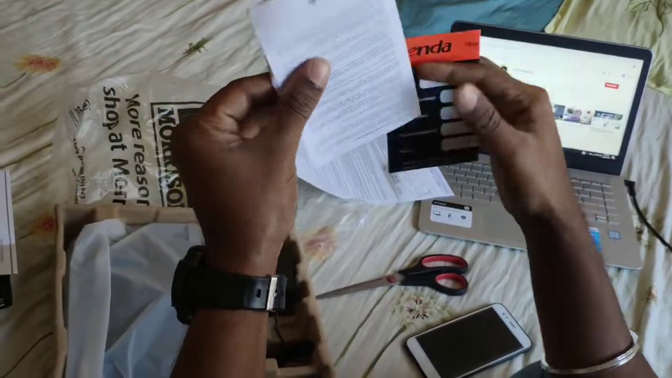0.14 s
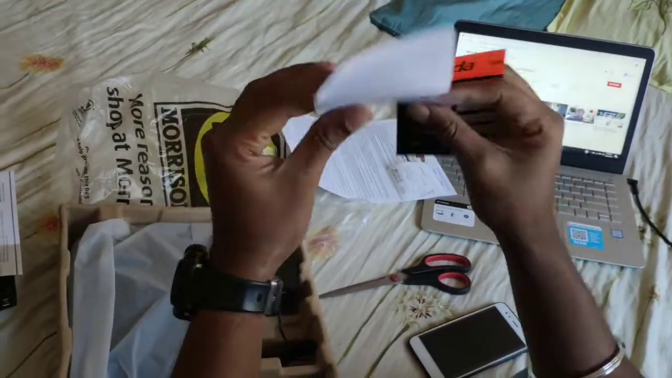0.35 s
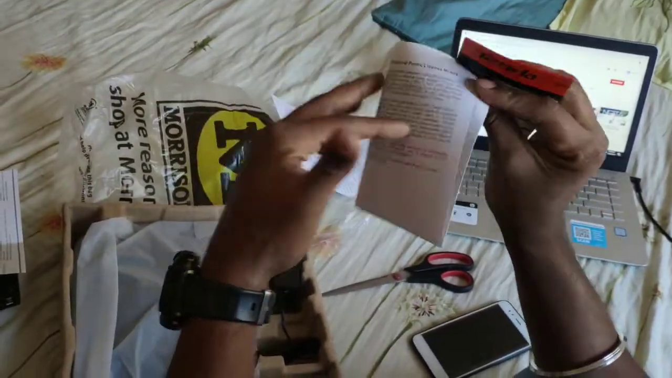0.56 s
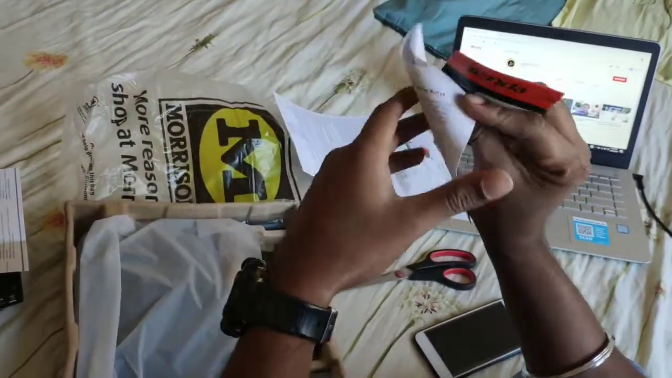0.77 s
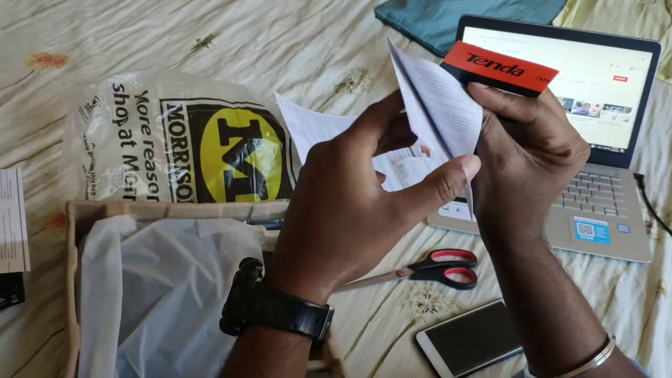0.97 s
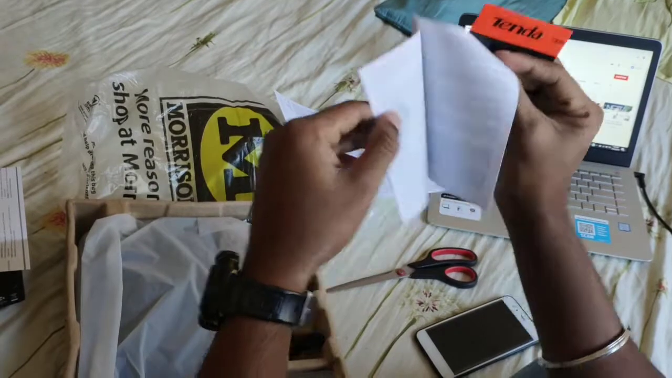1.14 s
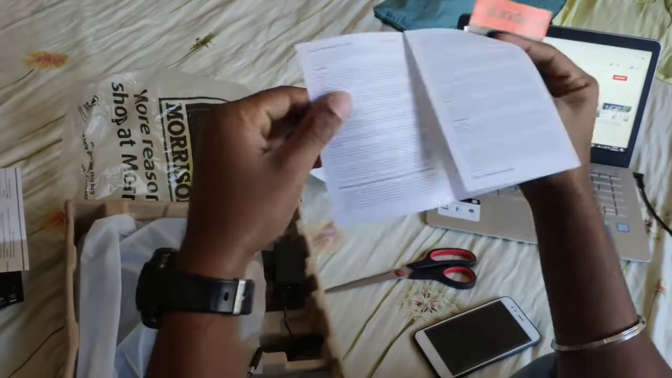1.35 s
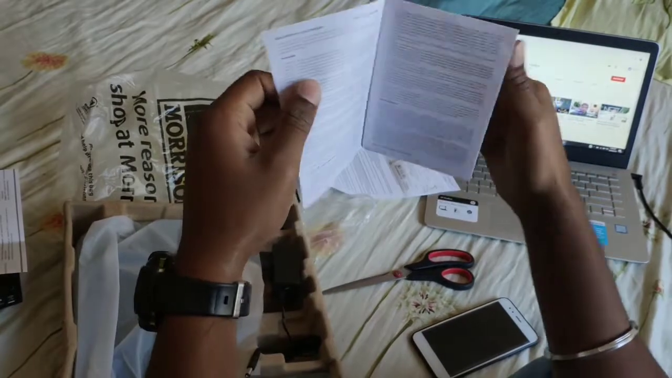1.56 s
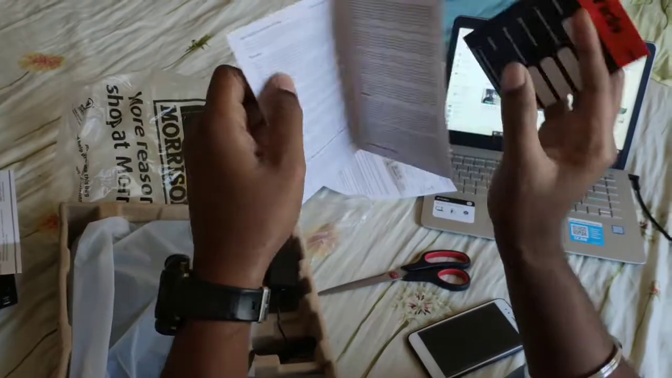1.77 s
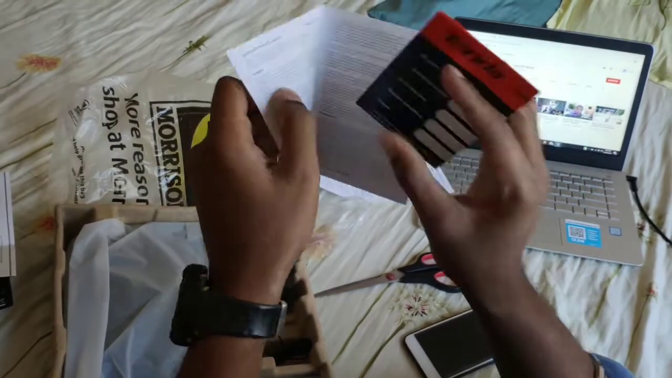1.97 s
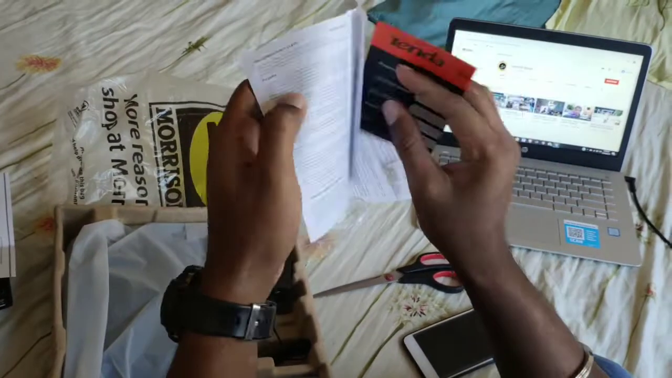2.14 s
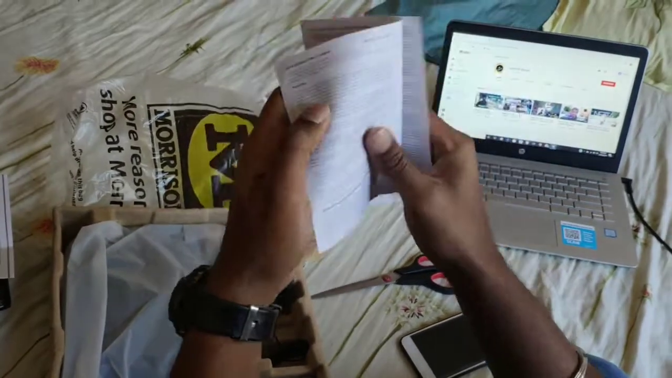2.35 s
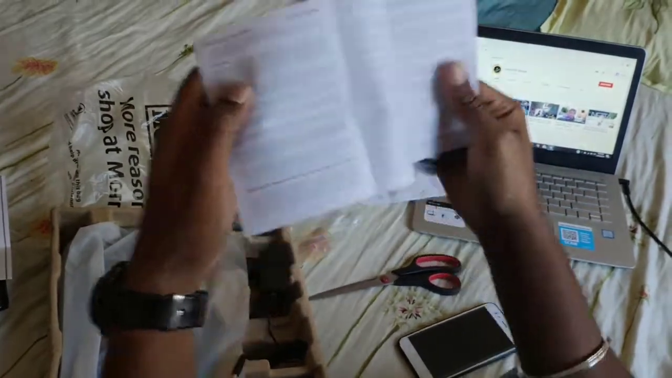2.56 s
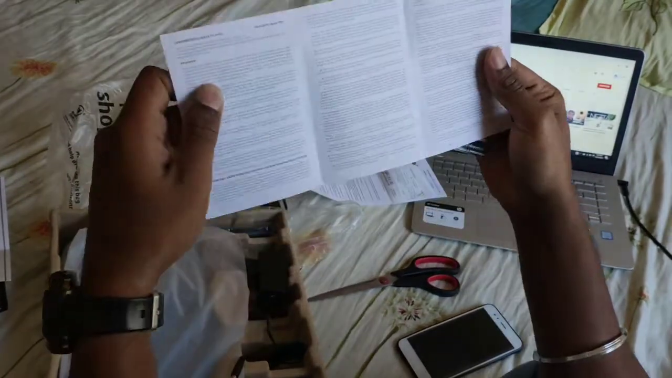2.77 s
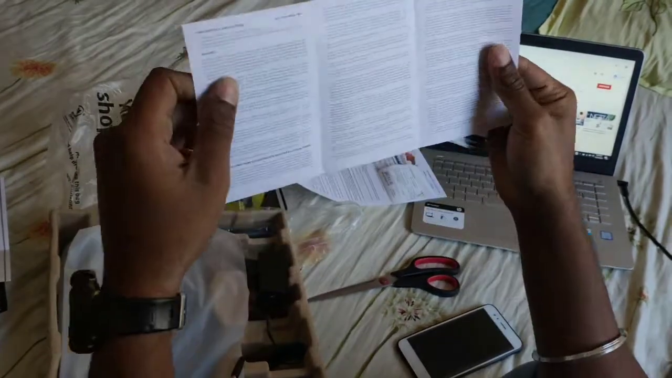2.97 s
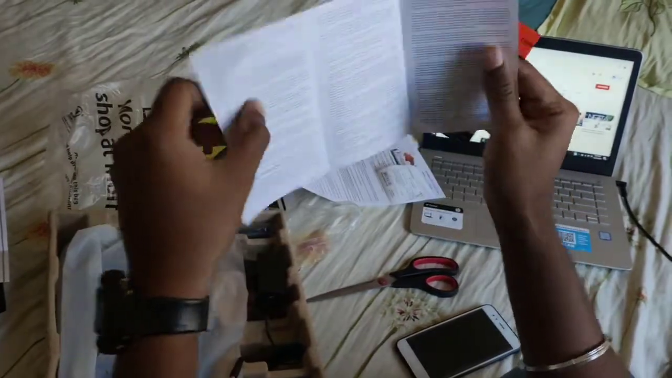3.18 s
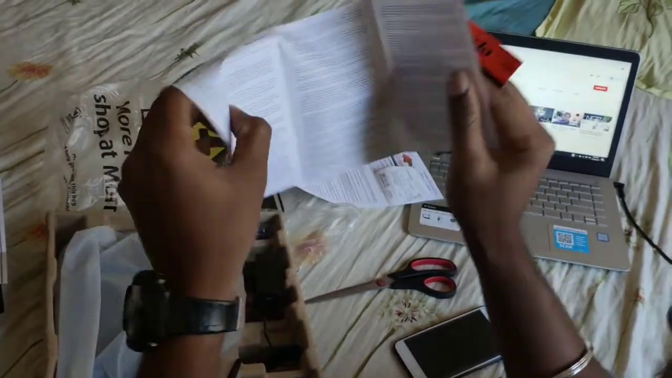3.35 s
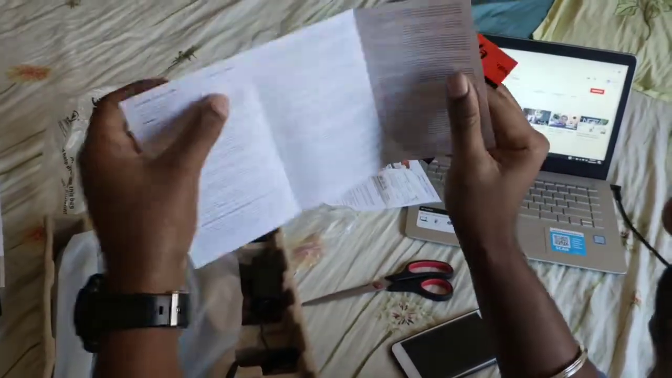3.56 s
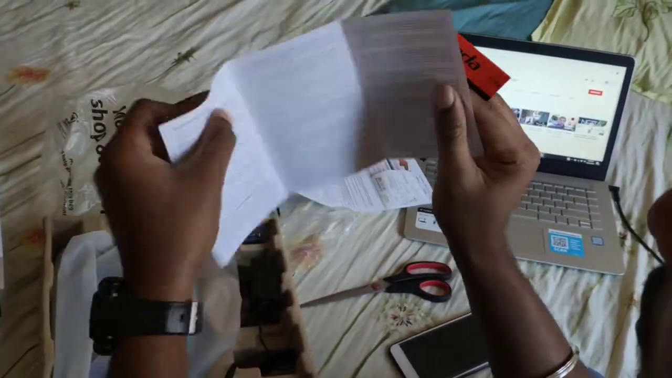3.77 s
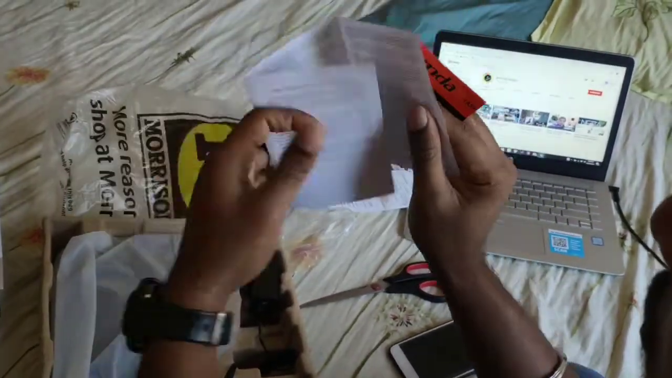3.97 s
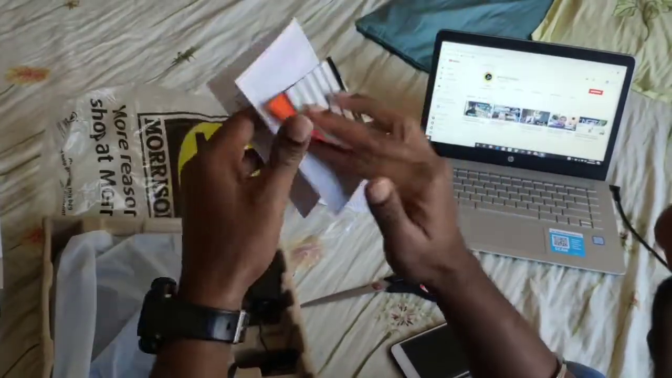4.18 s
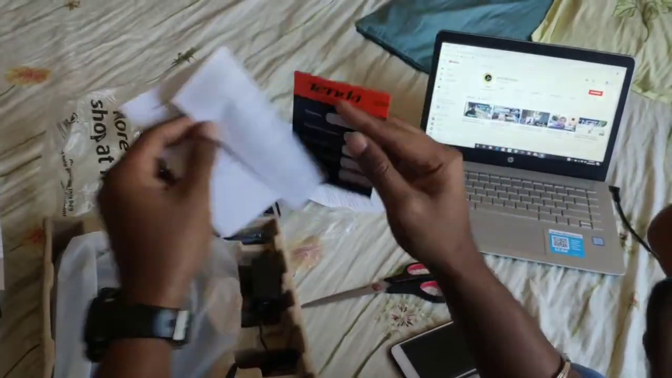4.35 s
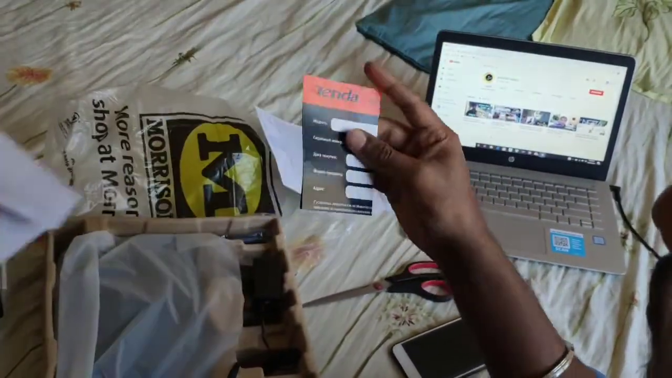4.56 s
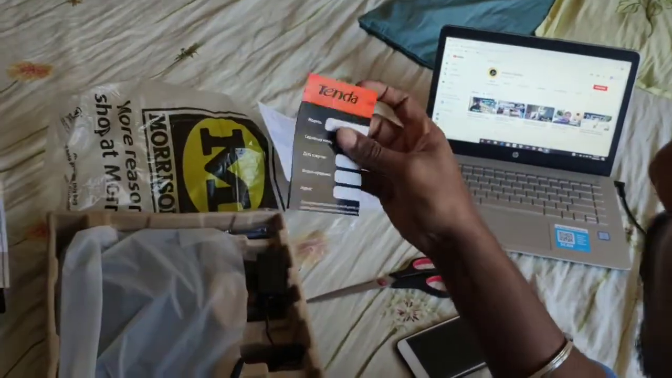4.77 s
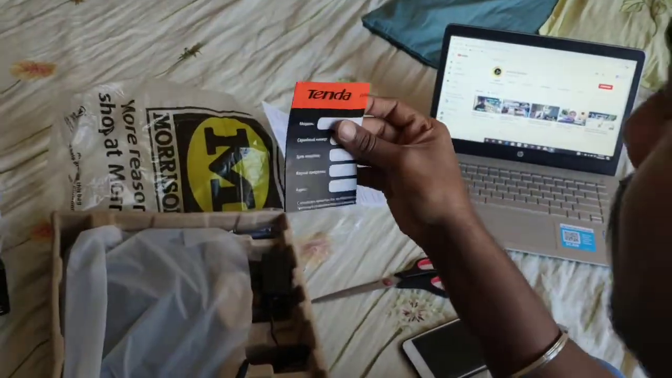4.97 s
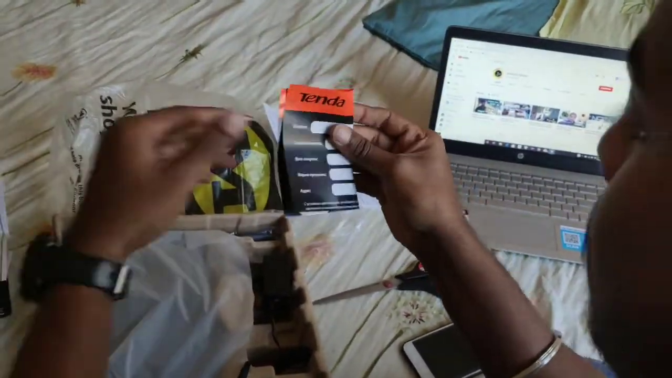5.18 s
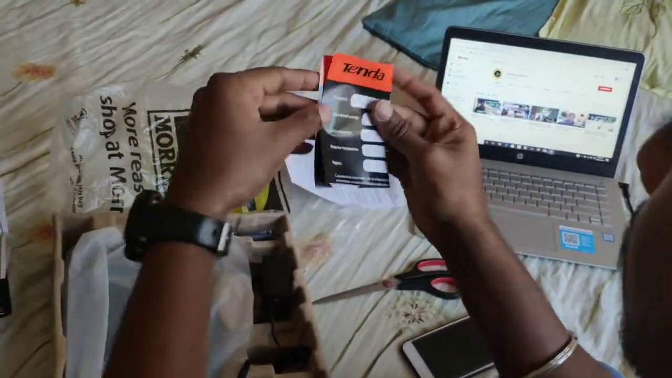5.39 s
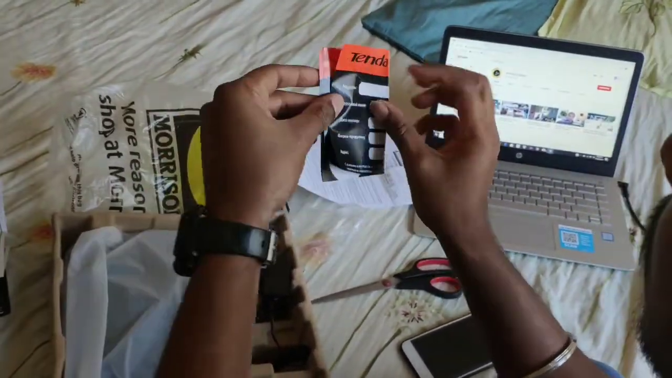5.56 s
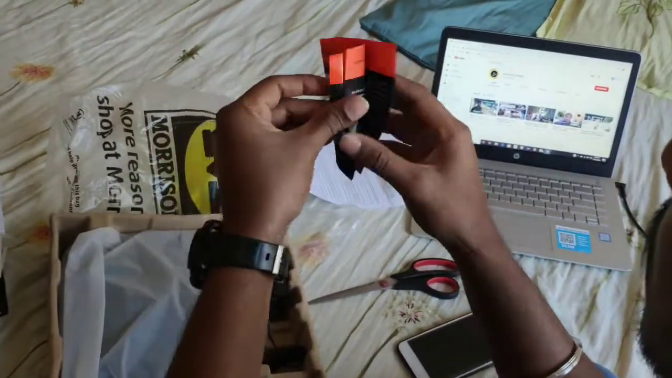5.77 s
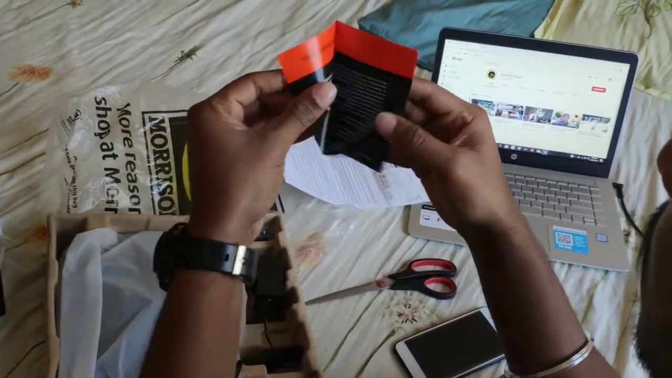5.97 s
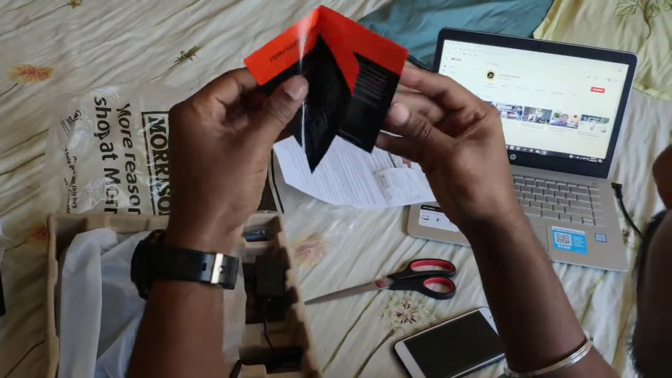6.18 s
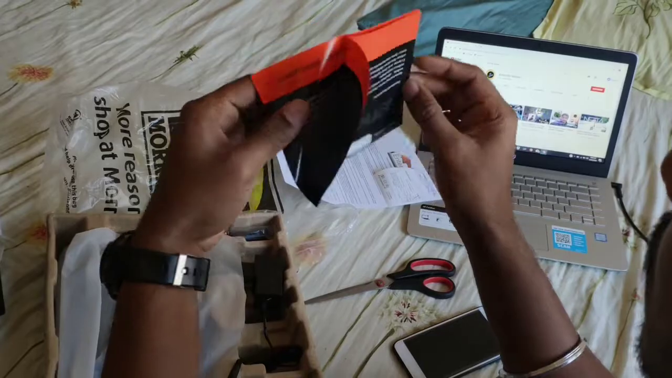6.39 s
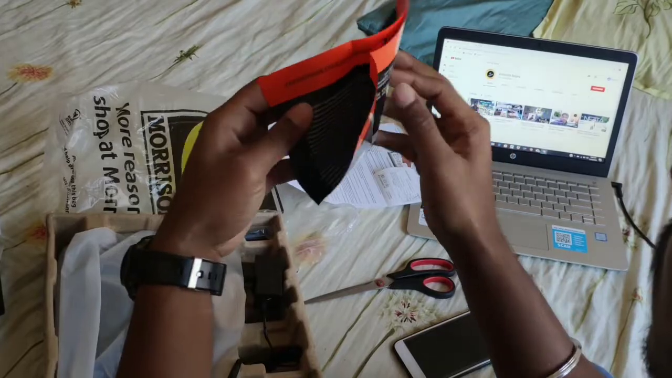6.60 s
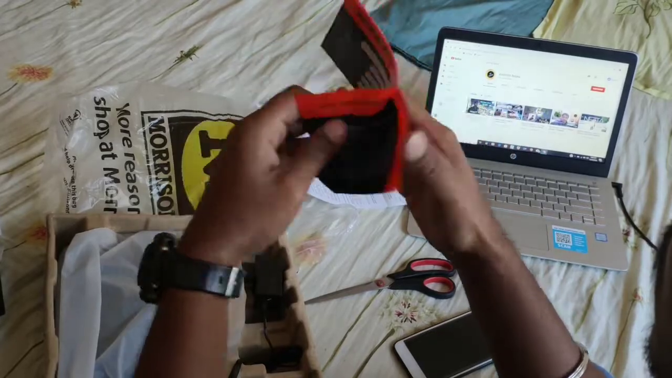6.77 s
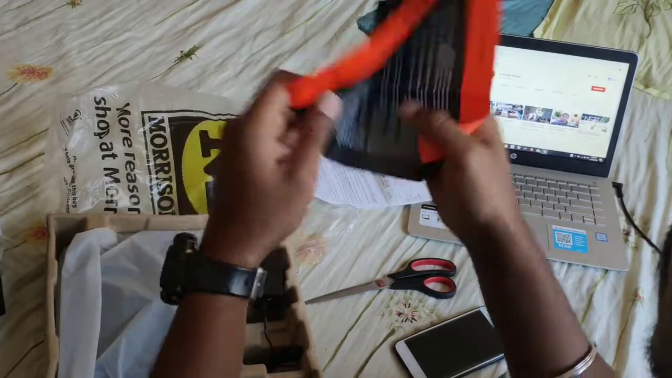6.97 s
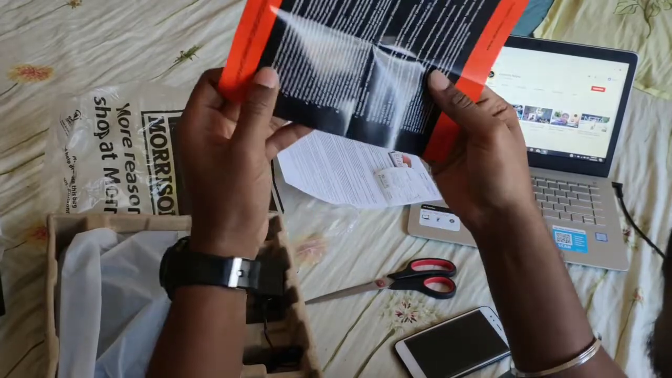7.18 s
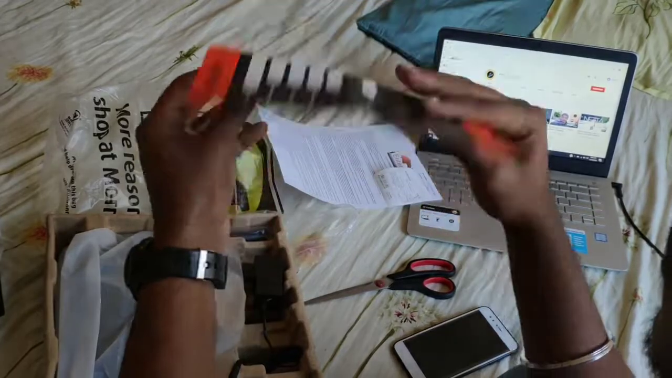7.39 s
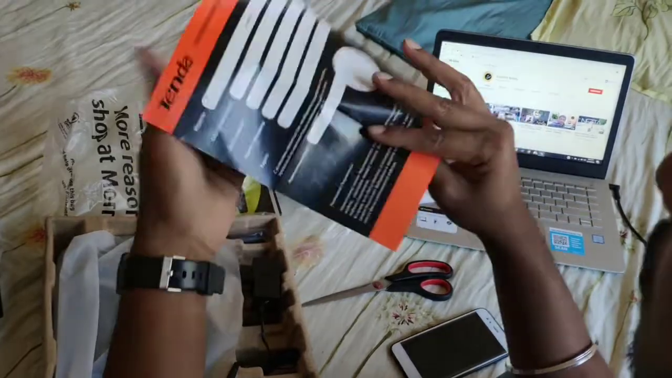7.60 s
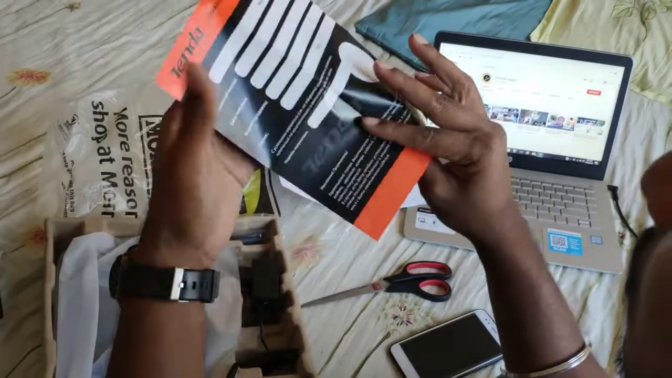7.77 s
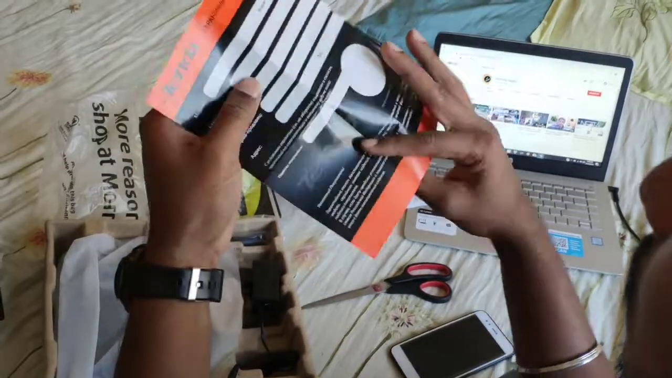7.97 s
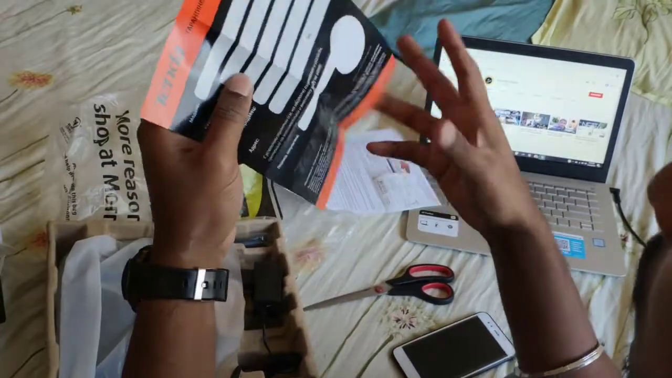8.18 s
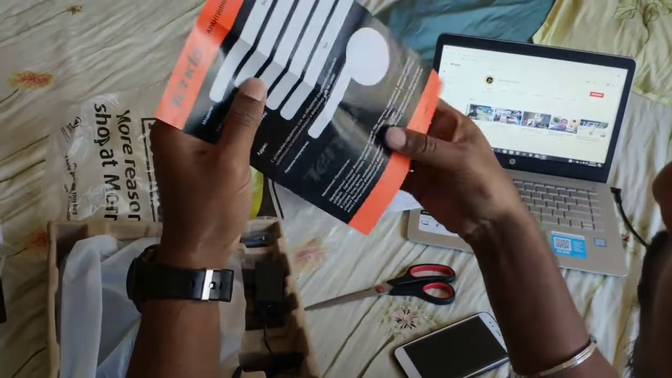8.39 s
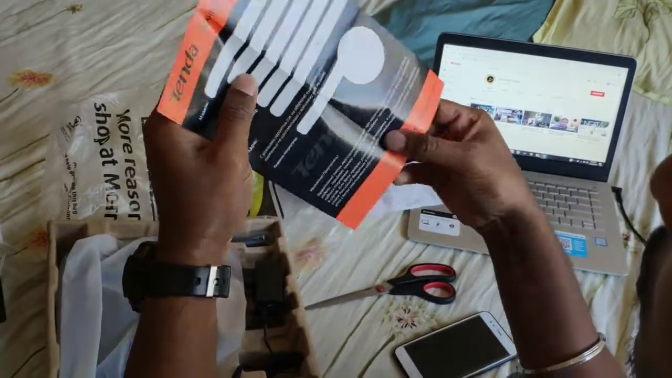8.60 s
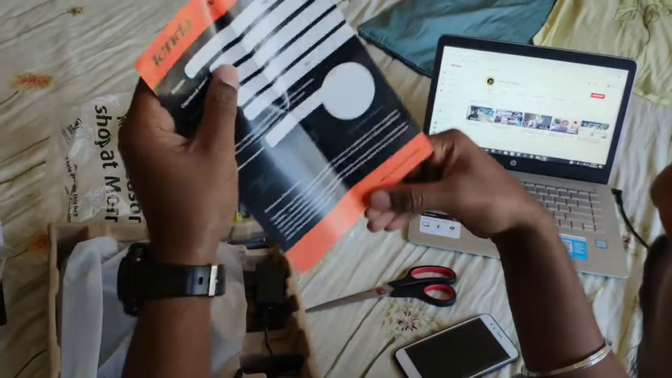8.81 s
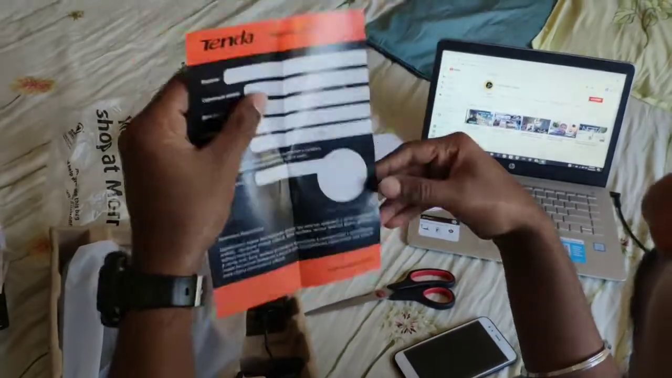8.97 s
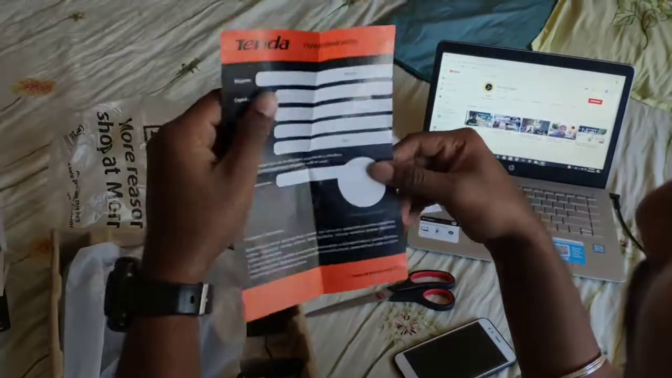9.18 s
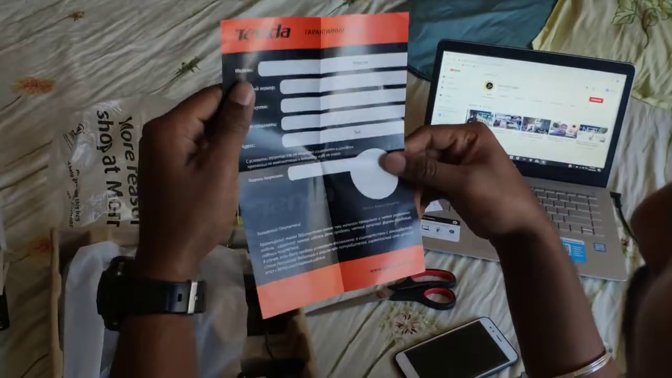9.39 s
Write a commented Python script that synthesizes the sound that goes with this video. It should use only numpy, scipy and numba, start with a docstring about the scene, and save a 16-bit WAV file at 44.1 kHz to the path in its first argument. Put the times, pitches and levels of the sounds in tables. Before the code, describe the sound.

Close, crisp paper rustling: creases snap, sheets rub and flutter with soft air puffs, over faint low rumble and hiss indoors.

```python
"""Hands unfold a thin paper leaflet, put it down, then unfold a stiffer glossy one, under a phone in a bedroom.
Creases snap as ragged noise bursts; sheets rub and crackle as noise shaped by tiny slips; swung sheets push
low puffs of air. The small room answers the paper, over a low wavering rumble and a faint hiss throughout.
The phone's two microphone ports ring at different pitches."""
import sys
import numpy as np
from scipy import signal
from scipy.fft import rfft, irfft, next_fast_len
from scipy.io import wavfile
from scipy.ndimage import uniform_filter1d
from numba import njit

SR = 44100
rng = np.random.default_rng(int(sys.argv[2]) if len(sys.argv) > 2 else 0)


def bounce(signal):
    """Save signal as a 16-bit WAV file at the path given by the first command-line argument."""
    frames = np.transpose(np.atleast_2d(signal))
    limited = np.clip(frames, -1, 1)
    pcm = np.round(limited * 32767).astype(np.int16)
    wavfile.write(sys.argv[1], SR, pcm)


N = 416372  # length in samples

# Snapping creases. Each row: peak time in seconds, ring peak in dB, sheet ring in Hz, flap in dB re ring,
# crispness in dB re ring, decay in seconds per 60 dB, left minus right in dB.
CREASE_SNAPS = [(.3277, -42, 3630, 1, -11, 0.014, -14), (.3455, -33.5, 5440, -21, -4, 0.036, -9),
                (0.502, -27, 4810, -8, -2, .028, -13), (0.527, -16, 4460, -15.5, 0, 0.018, -7),
                (.5711, -14.5, 4700, -15, -12, 0.035, -2.5), (0.7693, -16.5, 5130, -22, -13, .013, -10),
                (.784, -36, 5120, -24, -8, .02, -7), (.877, -27.5, 5050, -20, 8, 0.024, -10),
                (0.8885, -26.5, 5200, -14, 10, 0.032, 2), (.978, -32, 5100, -28, -4, 0.036, -2),
                (1.109, -31, 5200, -19, 3, .015, -10), (1.1194, -7.5, 4940, -26.5, -10, 0.018, -8.5),
                (1.2291, -33.5, 5240, -26, 1, 0.11, -13), (1.316, -36.5, 5200, -20, 0, 0.02, -7),
                (1.4406, -28.5, 4500, -5.5, -2, 0.11, 0.5), (1.866, -46.5, 4500, 6, -10, .012, 5),
                (2.0735, -35, 5620, -1, 4.5, .014, -2), (2.176, -28, 4800, -5.5, -0.5, 0.036, 1),
                (2.206, -8.5, 5330, -10.5, -1, 0.012, -4), (2.5811, -26.5, 3800, -4, -24, 0.084, 1),
                (2.6785, -4, 5080, -17, -15, 0.044, 1), (3.1843, -35.5, 5950, -23, -10, 0.0096, -16),
                (3.3157, -20.5, 4900, -9, -21, 0.027, 3), (3.442, -24.5, 5000, -2, -9, 0.032, 2),
                (3.4517, -9.5, 5000, -26, -16, 0.026, 0), (3.4745, -17, 5860, -25, -10, .011, -3),
                (3.5899, -29, 4000, -7, -18, .04, 4), (3.611, -25.5, 5010, -1, -15, 0.025, -2),
                (3.655, -13.5, 5600, -28, -1, .008, -2), (3.67, -12, 5100, -11, -4, 0.047, 5.5),
                (3.842, -23.5, 4960, -4.5, -14, 0.052, -1), (3.8854, -29, 5100, -18, -10, 0.033, -7),
                (4.102, -28, 5200, -17, 3, .02, -4), (4.113, -28, 5030, -12, 10, .045, -4),
                (4.3094, -12.5, 4750, -16.5, 1.5, 0.055, -2), (4.3376, -18, 4500, -28, -8, .012, -12),
                (4.359, -0.5, 4700, -29, -24, .019, -1), (4.8133, -24.5, 6460, -27, -6, 0.076, -7),
                (4.8673, -14.5, 4900, -17, -8, 0.06, 11.5), (5.0594, -28.5, 4420, -17, -15, 0.0059, -7),
                (5.0685, -35, 4600, -1.5, 0, 0.0079, -13), (5.3133, -36.5, 3560, -19, -1, 0.012, -7),
                (5.342, -24.5, 3650, -29, -1.5, 0.023, -1), (5.4254, -26.5, 3320, -2, -21, 0.0063, -7),
                (5.436, -32, 3890, -17, 2, 0.0092, 8), (5.4577, -20.5, 3720, -25, 0.5, 0.007, 0),
                (5.602, -8, 3640, -24, 7.5, 0.0075, 1), (5.656, -17.5, 3440, -15, -7, .018, -5),
                (5.697, -12, 3900, -23, -10, 0.0035, -7), (5.7143, -21.5, 3600, -9, -16, 0.0082, -9),
                (5.758, -4.5, 4100, -20, 2, 0.0052, -3), (5.8166, -17, 4130, -24, -3, 0.034, -2),
                (5.8368, -19, 4100, -26, -7, 0.018, -9), (5.867, -9.5, 3990, -35, -3, .018, -2),
                (5.995, -33.5, 4120, -21, -15, .009, -11), (6.0211, -23, 4080, -9, -9, .025, -1),
                (6.0453, -17.5, 3500, -26, -0.5, 0.021, -7), (6.0885, -32.5, 3600, 7, -15, 0.011, 0),
                (6.1955, -13.5, 4530, -22, 4, 0.02, 1.5), (6.2602, -35, 4400, -3, -13, 0.021, 0),
                (6.298, -27.5, 3770, -11.5, -2, 0.029, 2), (6.3837, -32, 4130, -15, 0, .04, 0),
                (6.4677, -17, 4140, -9, -17, 0.0097, 0.5), (6.52, -24.5, 3130, -2.5, -27, 0.0061, -2),
                (6.553, -35.5, 3910, -5, -6, .018, -2), (6.7562, -35, 5030, -15, 4, 0.046, -9),
                (6.8106, -25, 4760, -15, -1, 0.014, 1), (6.9128, -34, 5380, -29, -15, 0.023, -11),
                (6.9664, -25.5, 3830, -9, 0, 0.032, -4.5), (6.982, -36.5, 4000, 5, -10, 0.022, -2),
                (7.091, -18.5, 4200, -2, -10, 0.014, 1), (7.102, -7, 3930, -11.5, -10, .02, -3.5),
                (7.1298, -13, 5000, -23, 3, 0.013, -2), (7.2384, -31, 5390, -8.5, -7, 0.031, -7),
                (7.308, -23.5, 4730, 0, -4, 0.033, -3), (7.353, -32, 3280, 7, -22, 0.033, 2),
                (7.382, -3, 4570, -17.5, -4.5, 0.0051, -2), (7.3932, -28, 4830, 3, 2, 0.027, 5),
                (7.466, -27, 4700, -12, -4, 0.06, -8), (7.501, -31, 4300, 1, -10, .025, -1),
                (7.58, -21, 4500, -12, -7.5, .012, -6), (7.5873, -16.5, 3860, -8, -25, 0.027, -2),
                (7.638, -28, 5200, -24, -15, .018, -14), (7.703, -16.5, 3100, -10.5, -30, 0.036, -1),
                (7.7561, -15.5, 4270, -16, -13, 0.024, 4), (7.7659, -1, 5150, -20, -22, 0.013, -2.5),
                (8.002, -30.5, 4800, -5.5, -8, 0.019, -5), (8.121, -35.5, 4000, 6, -12, .015, -3),
                (8.1389, -24, 3700, -29, 1, 0.015, -8.5), (8.2006, -29, 5100, 2.5, 0, 0.038, -1),
                (8.2671, -32.5, 4950, -5, -8, 0.014, -7), (8.343, -36.5, 4000, 6, -13, 0.013, 0),
                (8.3562, -21.5, 5400, -26, 6.5, 0.028, -3), (8.3827, -25, 5520, -9, 1, 0.015, -5),
                (8.3984, -15.5, 5900, -7, 8.5, 0.015, -0.5), (8.6568, -45, 3250, 17.5, 4, 0.03, -1),
                (8.8406, -12, 3900, -9.5, -15, .005, -1.5), (9.0126, -35, 5470, -7.5, 5.5, 0.045, -2),
                (9.132, -38, 5500, -1, 3, 0.018, 0), (9.1838, -35, 5880, -4, 2, 0.0099, 2),
                (9.2237, -26.5, 4500, -1.5, -19, 0.03, -1)]
BUILD_SHARE = 0.62  # build-up of a snap as a share of its decay


def snaps():
    """A crease buckles in a ragged run of slips that builds to one crack and dies fast; the sheet rings and flaps."""
    size, lead = 4096, 1536  # samples in a snap, and those before its crack
    out = np.zeros((2, N + size))
    t = (np.arange(size) - lead) / SR
    for peak_s, ring_db, ring_hz, flap_db, crisp_db, t60, pan_db in CREASE_SNAPS:
        build = -t / max(BUILD_SHARE * t60, 1e-3)
        die = t / max(t60, .003)
        fade = decay(np.where(t < 0, build, die), 1)
        crack = 1.7 * (t >= 0) * np.exp(-np.abs(t) / 0.0001)
        # a steady floor keeps the run going between slips
        run = fade * (1.11 + crackle(size, 0.0077, 1.28, 0.0013)) + crack
        ring = band(run * pair((size,), 0.056), ring_hz, 2.28)
        body = 0.27 * band(run * pair((size,), 0.031), 2780, 1.0)
        crisp = band(run * pair((size,), 0.025), 9100, 0.79)
        gains = undb([ring_db, ring_db + crisp_db, ring_db + flap_db])
        layers = [ring + body, crisp, flap(run)]
        snap = sum(gain * x / np.abs(x).max() for gain, x in zip(gains, layers))
        start = max(int(peak_s * SR) - lead, 0)
        out[:, start:start + size] += snap * sides(pan_db)[:, None]
    return out[:, :N]


def flap(grain):
    """The whole sheet flexes: its bass reaches both ports alike, its upper part does not."""
    bass = band(grain * pair(grain.shape, 1.0), 842, 0.63)
    upper = band(grain * pair(grain.shape, 0.05), 1320, 0.57)
    return bass + 0.54 * upper


# Rubbing strokes, each a swell and a fade. Each row: peak time in seconds, ring level in dB at the peak,
# rise and fall in seconds per 20 dB, flap in dB re ring, crispness in dB re ring.
RUB_STROKES = [(0.044, -45, 0.032, 0.18, -12.5, 0.5), (.18, -47, 0.19, 0.061, -31, 1),
               (0.359, -43.5, 0.049, 0.076, -17, -3), (.44, -40, 0.034, 0.21, -20, 6.5),
               (.53, -36.5, 0.16, 0.17, -14, -7), (.79, -47, 0.19, 0.29, -27, 3.5),
               (.89, -41, 0.047, .17, -15, 0), (1.13, -37, 0.06, 0.12, -14, 0.5),
               (1.24, -48.5, .15, 0.18, -27, 2), (1.37, -46.5, .06, 0.097, -9, 3.5),
               (1.451, -45, 0.23, .08, -9, -5), (1.6, -65, 0.11, 0.087, 0, -1),
               (1.78, -71, 0.72, 0.61, -3, -2), (1.939, -51.5, 0.045, 0.07, 3, 0),
               (2.1, -41, 0.033, 0.11, -4.5, 0), (2.22, -33.5, 0.039, 0.13, -9, -2),
               (2.29, -41.5, 0.14, 0.083, -24, 6.5), (2.511, -37, 0.35, 0.11, -9, 0.5),
               (2.69, -36, 0.028, 0.097, -2, -8), (2.85, -56.5, .1, 0.41, -5, -5.5),
               (3.261, -48.5, 0.14, 0.22, 3, 5), (3.46, -35.5, 0.067, 0.14, -4.5, -1),
               (3.61, -46, 0.057, 0.13, 6, -23), (3.679, -36.5, 0.1, 0.11, -7, -4),
               (3.86, -41.5, 0.13, 0.21, -4, -0.5), (4.121, -36, 0.056, 0.15, -8, 3),
               (4.24, -42.5, 0.063, 0.05, -6, -4), (4.36, -29.5, 0.095, 0.11, -15, -0.5),
               (4.53, -43, 0.095, 0.077, -22, -3), (4.66, -48, 0.23, 0.12, -15, -2),
               (4.82, -45, 0.094, .1, -24, 0), (4.879, -29.5, 0.037, 0.077, -6, -2),
               (5.0, -57, 0.11, .4, 0.5, -1), (5.22, -41.5, 0.079, 0.049, -9.5, -5.5),
               (5.36, -51.5, .15, 0.18, -1.5, -0.5), (5.53, -44.5, 0.035, 0.062, -12, -1.5),
               (5.6, -48, 0.039, 0.46, -12, -2), (5.7, -44.5, 0.17, .2, -11, 1.5),
               (5.77, -29, 0.043, 0.14, -18.5, 1), (5.87, -38, 0.17, 0.053, -12.5, 4.5),
               (6.05, -35.5, 0.047, 0.11, -4, 2), (6.21, -44, 0.053, 0.12, -6, 6.5),
               (6.38, -45.5, .3, 0.076, -14, -7), (6.48, -50.5, .03, 0.48, -11, -1),
               (6.69, -48.5, 0.58, 0.15, -12.5, -1.5), (6.82, -44, 0.18, 0.2, -9.5, 0.5),
               (6.99, -44, 0.028, 0.35, -6.5, 5), (7.05, -45.5, 0.093, .1, -15, -2),
               (7.115, -32.5, 0.045, 0.11, -6.5, -1), (7.27, -44, 0.21, .15, -16, -2),
               (7.4, -43, 0.034, 0.45, -4, 2), (7.6, -46, .2, .2, -18, -9),
               (7.72, -39.5, 0.38, 0.12, -9, -7), (7.77, -30.5, 0.055, 0.082, -16, -4),
               (7.94, -49.5, .4, .04, -23, 0), (8.015, -51.5, .015, 0.2, 2, 5),
               (8.1, -42.5, 0.098, 0.092, -19, 1), (8.19, -40, 0.2, 0.16, -5.5, -3),
               (8.36, -51, 0.039, .1, 6, -4), (8.41, -31, 0.053, 0.055, -4, -0.5),
               (8.6, -52, .2, 0.11, -6.5, -5), (8.67, -48.5, 0.04, 0.063, 1, -3),
               (8.79, -42.5, 0.083, 0.24, -5.5, 3), (8.99, -55, 0.19, 0.15, -5, -8),
               (9.15, -56, 0.06, 0.44, -2.5, -3), (9.29, -46.5, 0.087, 0.063, -7, 1.5)]


def strokes():
    """Gains of ring, flap and crisp part: the powers of all strokes add up."""
    t, power = np.arange(0, N, 32) / SR, 0  # every 32nd sample is fine enough
    for peak_s, ring_db, rise, fall, flap_db, crisp_db in RUB_STROKES:
        before, after = (peak_s - t) / max(rise, .01), (t - peak_s) / max(fall, .01)
        slope_db = -20 * np.where(t < peak_s, before, after)
        part_db = np.array([[0], [flap_db], [crisp_db]])
        power = power + undb(ring_db + slope_db + part_db) ** 2
    return [np.interp(np.arange(N) / SR, t, np.sqrt(p)) for p in power]


# Ring of the rubbed sheet, lower while the glossy leaflet is still folded.
# Each row: time in seconds, centre of the ring in Hz.
RUBBED_SHEET_RING = [(0, 4800), (1.2, 5180), (2.0, 4900), (2.35, 5630), (2.65, 4960), (4.3, 5140),
                     (4.8, 5470), (5.2, 3640), (6.05, 4180), (6.25, 4770), (8.3, 5100), (8.6, 5800),
                     (9.44, 5500)]
RUB_PAN_DB = 0.5  # left minus right


def rub():
    """Fibres slip in dense tiny ticks under sparser creaks of uneven size; their patter comes in gusts."""
    (hz,) = columns(RUBBED_SHEET_RING)
    gain, flap_gain, crisp_gain = strokes()
    ticks = crackle(N, .02, 4.0, .0015)
    creaks = crackle(N, .002, 3.5, .002)
    gusts = undb(1.5 * walk(45) + 1.0 * walk(14))
    grain = unit(ticks + 0.44 * creaks + 1.6) * gusts
    # the bend of the sheet keeps shifting its ring, in octaves
    bend = 0.13 * walk(12)
    ring = unit(band(grain * pair((N,), 0), hz * 2 ** bend, 1.95))
    # a narrow crackling band whose pitch hops at random every 384 samples
    hop = np.repeat(rng.standard_normal(N // 384 + 1), 384)[:N]
    slips = crackle(N, .006, 2.5, .0015)
    hopping = undb(-7) * unit(band(slips * pair((N,), 0), hz * 2 ** (0.46 * hop), 4.1))
    # body, crisp part and flap each waver in level by themselves
    body = undb(-7.5 + 2.0 * walk(10)) * unit(band(grain * pair((N,), 0), 2670, 1.0))
    crisp = crisp_gain * undb(3.65 * walk(30)) * unit(band(grain * pair((N,), 0), 8150, 0.59))
    flex = flap_gain * undb(2.0 * walk(25)) * unit(flap(grain))
    # the hands drift a little from side to side
    place = sides(RUB_PAN_DB + 0.77 * walk(3.03))
    return (gain * (ring + hopping + body) + crisp) * place + flex


# Puffs of air from swung sheets.
# Each row: start in seconds, peak in dB, pitch in Hz, left minus right in dB.
AIR_PUFFS = [(.324, -41, 129, -11), (0.381, -45, 83.4, -20), (.892, -42.5, 200, -1), (1.929, -41.5, 130, 2),
             (2.201, -34.5, 164, 1), (2.664, -29, 128, -0.5), (3.3, -36, 137, 1), (4.547, -39.5, 241, 2),
             (4.848, -34.5, 262, 3), (5.454, -41, 80.7, -19), (5.51, -43, 80, -19), (5.647, -45, 99.6, -4),
             (5.752, -39, 191, 4), (6.037, -32.5, 240, 1), (7.395, -38.5, 118, 2), (7.473, -38, 88.8, 3),
             (7.57, -34, 306, 1), (7.752, -28, 301, 3), (8.001, -45.5, 80.7, -5), (8.406, -36, 302, 1),
             (8.649, -32, 192, 1)]
PUFF_T60_S = 0.18


def puffs():
    """Soft low bumps of pushed air: noise with a quick swell and a slower fade, in a wide low band."""
    size = 8192
    out, t = np.zeros((2, N + size)), np.arange(size) / SR
    for start_s, peak_db, hz, pan_db in AIR_PUFFS:
        swell = np.minimum(t / 0.0048, 1) * decay(t, PUFF_T60_S)
        puff = band(swell * pair((size,), 1.0), hz, 0.66)
        puff = undb(peak_db) * puff / np.abs(puff).max()
        start = int(start_s * SR)
        out[:, start:start + size] += puff * sides(pan_db)[:, None]
    return out[:, :N]


ROOM_T60_S, ROOM_TREBLE_T60_S, ROOM_DB = .4, .32, -10


def room(x):
    """Dense echoes start after a millisecond or two; treble dies first, bass is partly alike at both ports."""
    t = np.arange(SR // 2) / SR
    split = signal.butter(1, 1500, fs=SR)
    start = np.clip(t / 0.0012 - 1, 0, 1)
    low = signal.lfilter(*split, pair(t.shape, 0.52)) * decay(t, ROOM_T60_S)
    noise = pair(t.shape, 0)
    high = (noise - signal.lfilter(*split, noise)) * decay(t, ROOM_TREBLE_T60_S)
    echoes = unit(start * (2.0 * low + high)) / np.sqrt(len(t))
    return undb(ROOM_DB) * signal.fftconvolve(x, echoes, axes=1)[:, :N]


# Slow course of the rumble. Each row: time in seconds, then the levels in dB
# of the deepest part, the low part, the drone and the upper bass, about which each wavers.
RUMBLE_LEVELS = [(0, -56, -54, -83, -67), (.94, -56, -62.5, -63.5, -68.5), (1.57, -55, -60.5, -68.5, -64.5),
                 (2.73, -58, -56.5, -57.5, -58.5), (3.15, -64, -61, -72.5, -68), (3.5, -57, -54, -58, -57),
                 (4.29, -56.5, -55, -68, -63), (4.89, -59, -56, -53.5, -63), (5.3, -54.5, -53, -68, -62),
                 (5.81, -53, -54.5, -60.5, -57), (6.8, -56.5, -59, -63.5, -64),
                 (7.1, -64, -52.5, -53.5, -57.5), (7.8, -51, -56, -61.5, -59.5),
                 (8.47, -52, -57, -54.5, -55), (9.12, -63, -57, -61, -62), (9.44, -54, -54.5, -65, -56.5)]
# The four parts in the same order. Each row: centre in Hz, width of each of two filter passes in Hz.
RUMBLE_PARTS = [(31, 20.6), (80, 160), (165, 20), (310, 132)]
RUMBLE_ALIKE = 0.94  # likeness of the two ports


def rumble():
    """Four bands of low noise, nearly alike at both ports, each wavering in level."""
    out = 0
    for level_db, (hz, width) in zip(columns(RUMBLE_LEVELS), RUMBLE_PARTS):
        alike = RUMBLE_ALIKE - 0.066 * (hz < 130)  # a little less alike in the depths
        waver_db = 2.2 * walk(2.98)
        out = out + undb(level_db + waver_db) * unit(band(pair((N,), alike), hz, hz / width))
    return out


# Colour of the hiss. Each row: frequency in Hz, relative density in dB per Hz.
HISS_COLOUR = [(240, -39), (400, -9), (520, 3), (1070, 7.5), (1760, 1), (5520, -25), (14600, -12),
               (16000, -21)]
HISS_DB = -65  # rms


def hiss():
    """Faint even noise, coloured in the spectrum and almost unrelated between the ports."""
    hz, db = np.transpose(HISS_COLOUR)
    size = next_fast_len(N)
    f = np.maximum(np.fft.rfftfreq(size, 1 / SR), 1)
    colour = undb(np.interp(np.log(f), np.log(hz), db))
    noise = irfft(rfft(pair((size,), 0.033)) * colour, size)[:, :N]
    return undb(HISS_DB) * unit(noise)


def crackle(size, share, spread_db, tail_s):
    """Envelope of sparse slips with uneven sizes, each with a short tail; giants are rare and capped."""
    chance = rng.random((2, size))
    sizes = undb(spread_db * np.minimum(-np.log(chance[1] + 1e-9), 4))
    ticks = (chance[0] < share) * sizes
    return unit(signal.lfilter([1], [1, -np.exp(-1 / (tail_s * SR))], ticks))


def undb(db):
    """dB to gain."""
    return 10 ** (np.asarray(db) / 20)


def unit(x):
    """Scale to rms 1."""
    return x / np.sqrt(np.mean(x ** 2) + 1e-30)


def decay(t, t60):
    """Exponential fade by 60 dB in t60."""
    return np.exp(-np.log(1000) * t / t60)


@njit
def svf(x, g, q):
    """State-variable band-pass with a moving centre g = tan(pi f / SR), gain 1 there."""
    y, b, l, k = np.empty(len(x)), 0., 0., 1 / q
    for i in range(len(x)):
        v = (b + g[i] * (x[i] - l)) / (1 + g[i] * (g[i] + k))
        b, l, y[i] = 2 * v - b, l + 2 * g[i] * v, k * v
    return y


def band(x, hz, q):
    """Band-pass each channel twice, for steep skirts."""
    g = np.tan(np.pi * np.clip(hz, 10, .45 * SR) / SR) + np.zeros(x.shape[-1])
    return np.array([svf(svf(row, g, 1. * q), g, 1. * q) for row in x])


def walk(rate):
    """Random levels held 1 / rate s and smoothed twice; scaled to rms 1."""
    k = max(int(SR / rate), 1)
    steps = np.repeat(rng.standard_normal(N // k + 1), k)
    return unit(uniform_filter1d(uniform_filter1d(steps, k), k)[:N])


def pair(shape, alike):
    """Noise for both ports with the given likeness, from 0 (unrelated) to 1 (the same)."""
    mid, side = rng.standard_normal((2, *shape))
    alike = np.clip(alike, 0, 1)
    shared, apart = np.sqrt(1 + alike) * mid, np.sqrt(1 - alike) * side
    return np.array([shared + apart, shared - apart]) / np.sqrt(2)


def columns(table):
    """Curve columns at every sample."""
    s, *cols = np.transpose(table)
    return [np.interp(np.arange(N) / SR, s, c) for c in cols]


def sides(pan_db):
    """Gains of the two ports for a left minus right level."""
    return undb(np.array([pan_db, -pan_db]) / 2)


def scene():
    """Paper, its room echo, the puffs and the background."""
    paper = snaps() + rub()
    return paper + room(paper) + puffs() + rumble() + hiss()


# Resonances of the two microphone ports.
# Each row: centre in Hz, width in Hz, lift (or dip, if negative) in dB.
LEFT_PORT_BANDS = [(2610, 730, 7.5), (5300, 7700, -9), (9970, 2200, 7), (12500, 5400, -7)]
RIGHT_PORT_BANDS = [(3614, 800, 7), (5870, 890, 5.5), (8480, 2700, -3.5)]
TOP_HZ = 15700


def record(dry):
    """Each port lifts or dips its own bands; the loudest cracks are rounded and the top is cut."""
    out = []
    for x, port in zip(dry, (LEFT_PORT_BANDS, RIGHT_PORT_BANDS)):
        for hz, width, db in port:
            g = np.full(N, np.tan(np.pi * hz / SR))
            x = x + (undb(db) - 1) * svf(x, g, hz / width)
        out.append(np.tanh(x / .8) * .8)
    return signal.sosfilt(signal.ellip(10, .2, 90, TOP_HZ, fs=SR, output="sos"), out)


dry = scene()
out = record(dry)
bounce(out)
```